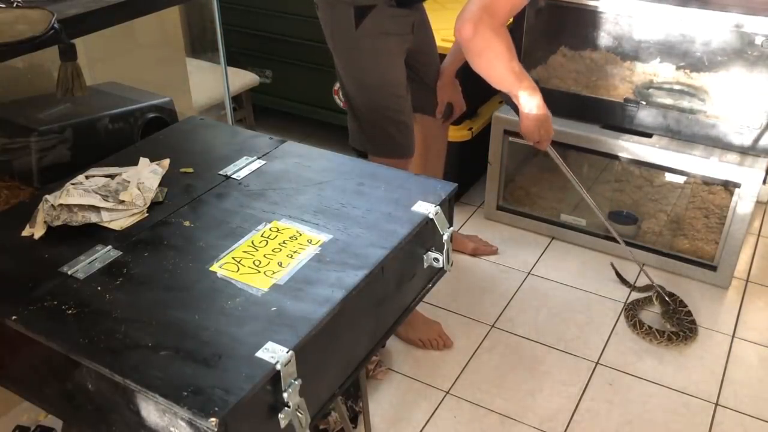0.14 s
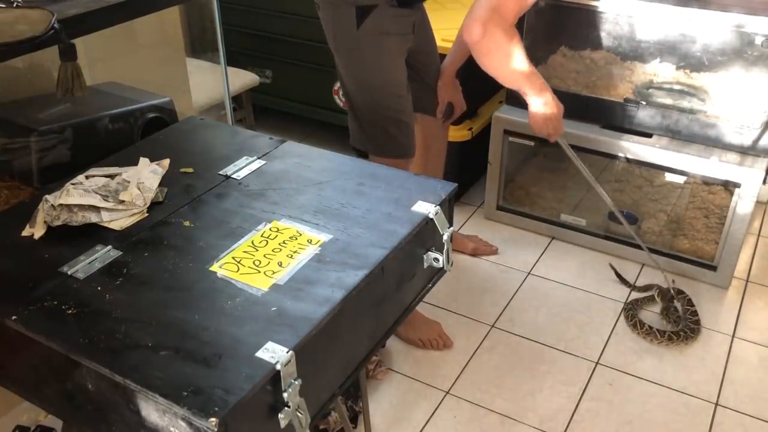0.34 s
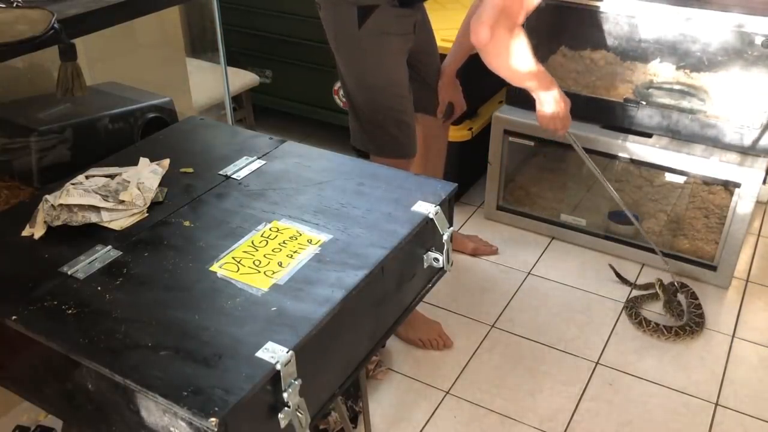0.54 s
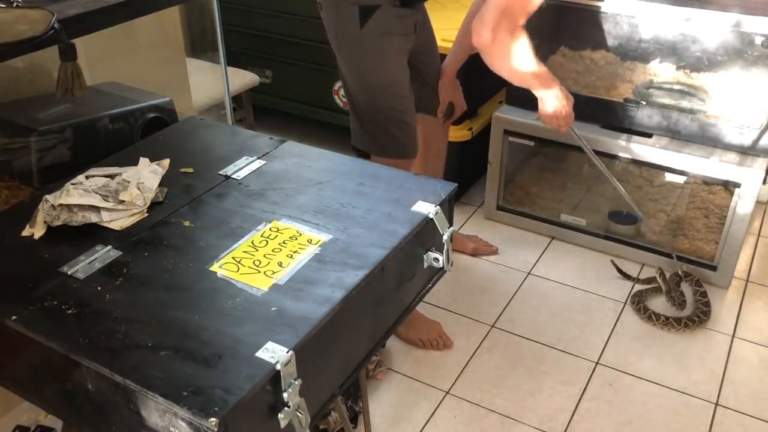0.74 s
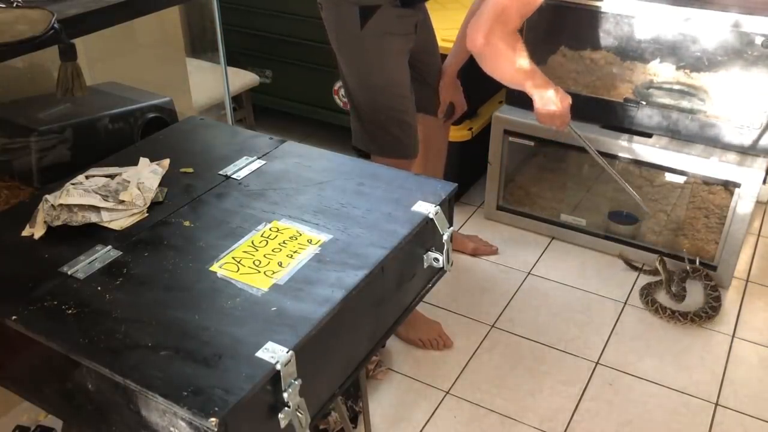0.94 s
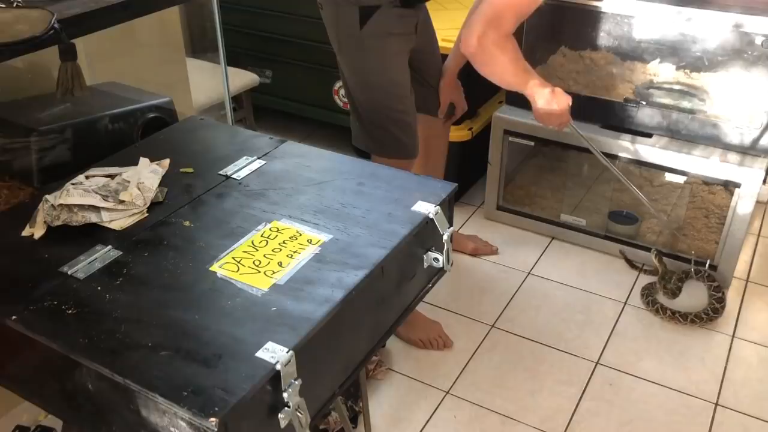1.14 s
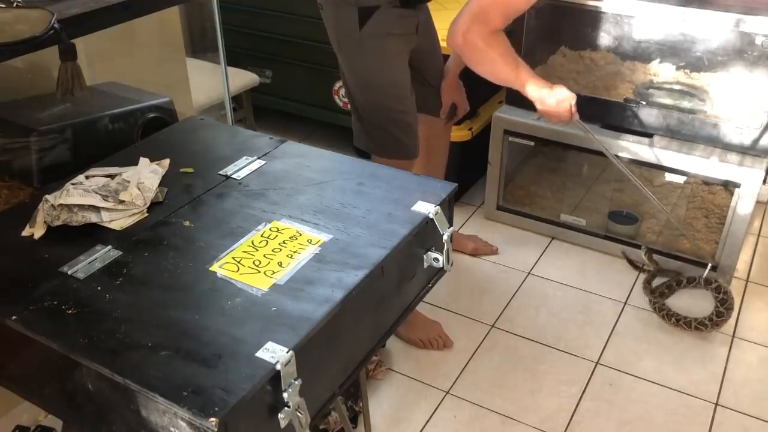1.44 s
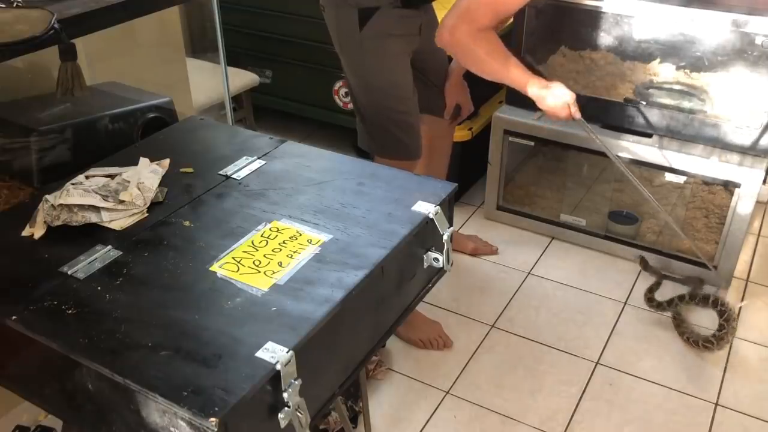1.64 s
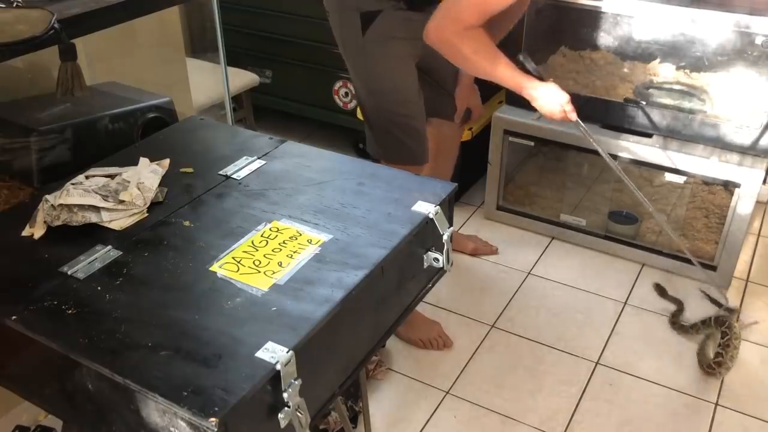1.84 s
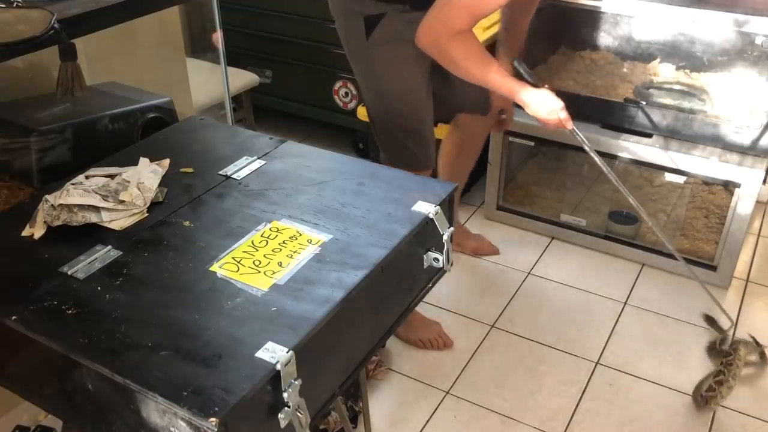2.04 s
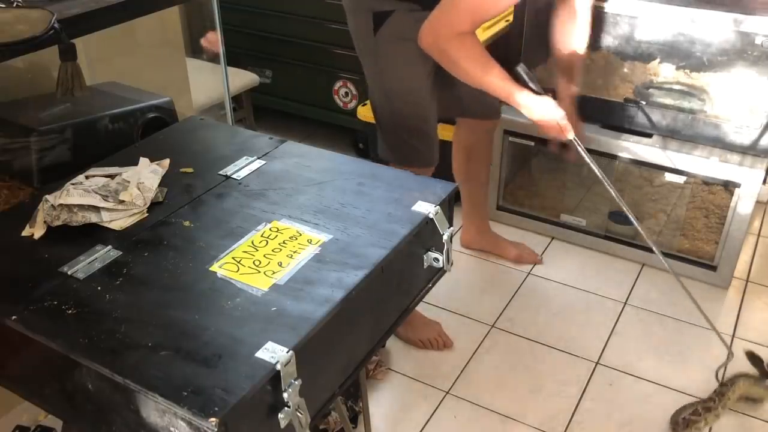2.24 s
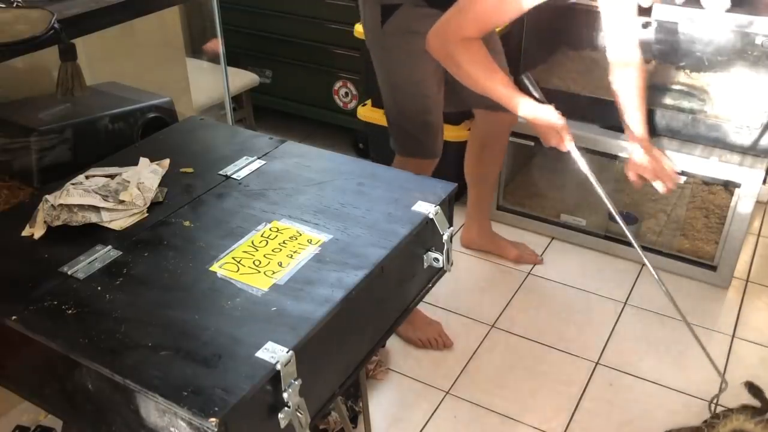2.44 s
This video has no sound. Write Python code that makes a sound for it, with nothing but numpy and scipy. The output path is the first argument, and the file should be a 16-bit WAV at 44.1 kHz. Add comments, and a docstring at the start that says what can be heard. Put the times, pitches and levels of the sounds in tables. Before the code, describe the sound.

A rattlesnake's tail buzzes from start to end, about 2.5 seconds: very fast dry clicks blurred into a bright, sizzling hiss, strongest around 4 to 7 kHz, with slight swells, sharper ticks and brief gliding rings. At about 1.1 seconds comes a short, light, hard double knock. From about 2.1 seconds a faint soft scuff slides over tile. Low fan hum, airy noise and a thin whine stay underneath in a small reflective room.

```python
"""In a small tiled room a rattlesnake, lifted on a hook, buzzes its tail without a pause.
At each turn of the tail dry horn segments collide: impulses and rubbing noise excite the horn's resonances.
Diffuse reverberation and a floor echo blur the clicks into a hiss; narrow gliding resonances ring out in turn.
Filtered noise bursts give sharper ticks and a short knock, and band-limited noise a soft scuff.
Behind them are fans: wavering tones, coloured air noise and a thin narrow-band whine."""
import sys
import numpy as np
from scipy import signal
from scipy.fft import rfft, irfft
from scipy.io import wavfile
from scipy.ndimage import map_coordinates

SR = 44100
rng = np.random.default_rng(int(sys.argv[2]) if len(sys.argv) > 2 else 0)


def generate_wav(signal):
    """Clip the signal to [-1, 1] and save it as 16-bit WAV at the path in sys.argv[1]."""
    frames = np.transpose(np.atleast_2d(signal))
    scaled = np.clip(frames, -1, 1) * 32767
    pcm = np.round(scaled).astype(np.int16)
    wavfile.write(sys.argv[1], SR, pcm)


N = 114660
TIME = np.arange(N) / SR
RUB_S = 0.0067  # energy decay constant of horn rubbing on horn after each clack
ROOM_T60_S = 0.26  # time for the reverberation to fall by 60 dB


def from_db(db):
    """Level as a logarithm: 20 dB is a factor of ten in amplitude."""
    return 10 ** (np.asarray(db) / 20)


def rms_one(x):
    """Normalisation by mean power: scale to rms 1."""
    return x / np.sqrt(np.mean(x ** 2) + 1e-20)


def drift(corner_hz):
    """Low-passed noise: white noise through a double real pole gives smooth random variation of rms 1."""
    step = 40  # samples between the computed points
    pole = np.exp(-2 * np.pi * corner_hz * step / SR)
    noise = rng.standard_normal(N // step + 2002)
    slow = signal.lfilter([1], [1, -2 * pole, pole * pole], noise)[2000:]  # drop the settling
    return np.interp(np.arange(N) / step, np.arange(len(slow)), rms_one(slow))


def butter(x, hz, kind, order=2):
    """Butterworth filter: maximally flat in its passband."""
    corners = np.clip(hz, 10, .45 * SR)
    sos = signal.butter(order, corners, kind, fs=SR, output="sos")
    return signal.sosfilt(sos, x + 1e-18)


def colour(x, spectrum):
    """Minimum-phase filter by folded cepstrum; it wraps round, so steady sounds are under way at once."""
    hz, db = np.transpose(spectrum)
    grid_hz = np.arange(N // 2 + 1) * SR / N + 1
    log_gain = np.log(from_db(np.interp(np.log(grid_hz), np.log(hz), db)))
    cepstrum = irfft(log_gain)[:N // 2]
    response = np.exp(2 * rfft(cepstrum, N) - cepstrum[0])
    return irfft(rfft(x) * response, N)


def burst(start_s, decay_s):
    """Impact noise: random signs under an exponential amplitude decay, with unit energy."""
    age = TIME - start_s
    envelope = (age >= 0) * np.exp(-np.clip(age / decay_s, 0, 60))
    x = rng.choice([-1, 1], N) * envelope
    return x / np.sqrt(np.sum(x ** 2))


def smear(x, decay_s):
    """Diffuse-field decay: noise (rms 1) whose energy is that of x convolved with a wrapped exponential."""
    decay = np.exp(-np.minimum(TIME / decay_s, 60))
    energy = irfft(rfft(x ** 2) * rfft(decay), N)
    return rms_one(np.sqrt(np.abs(energy)) * rng.standard_normal(N))


def room_tail(x):
    """Statistical reverberation: convolution with decaying noise of unit energy, for tiles and walls."""
    gap_s = 0.0025  # silence before the first reflection
    tail = rng.standard_normal(N) * from_db(-60 * TIME / ROOM_T60_S) * (TIME > gap_s)
    tail = tail / np.sqrt(np.sum(tail ** 2))
    return irfft(rfft(x) * rfft(tail), N)


def in_room(x, room_db):
    """Superposition of the direct sound and its reverberation."""
    return x + from_db(room_db) * room_tail(x)


def rattle():
    """Impact and friction excite resonant horn; reverberation and a moving floor echo (comb filter) follow."""
    # level of the rattle in five frequency registers, before trim and flutter:
    # t/s, skirt level/dB, low body level/dB, high body level/dB, middle level/dB, top level/dB
    vigour = [(0.0, -51.5, -38.5, -37, -43.5, -42.5), (0.16, -46.5, -37, -36, -42, -41),
              (0.205, -48, -40.5, -37, -43, -39), (0.28, -47.5, -37, -34.5, -43.5, -42),
              (0.43, -47.5, -39, -36, -42.5, -40.5), (0.52, -46.5, -38, -35.5, -42, -40.5),
              (0.72, -44.5, -38.5, -34, -40.5, -40), (0.86, -46, -35.5, -34, -40, -38),
              (0.98, -49, -39, -37.5, -43.5, -42), (1.04, -42.5, -37.5, -32, -38, -38.5),
              (1.065, -49, -39, -35, -42, -39.5), (1.11, -49, -37.5, -35, -38, -38.5),
              (1.18, -49, -37, -37, -39.5, -40), (1.225, -50, -40.5, -34.5, -43, -42.5),
              (1.27, -49.5, -37.5, -34.5, -41.5, -40), (1.44, -48.5, -39, -35.5, -40, -40),
              (1.52, -50.5, -35.5, -35, -39, -39.3), (1.62, -48.5, -36.5, -35, -39.3, -39),
              (1.67, -45, -40.5, -35, -37.5, -40), (1.82, -45, -35, -34, -39.5, -37.5),
              (1.92, -44.5, -38, -36, -39.5, -42), (2.03, -47, -35, -36, -41.5, -40.5),
              (2.13, -43.5, -38, -35, -40, -40), (2.27, -47, -36, -36, -40, -40),
              (2.305, -60, -39.5, -39.5, -43.5, -43.5), (2.37, -47, -37.0, -36, -40, -39),
              (2.6, -43.5, -37.5, -36.5, -38.5, -41)]
    # limits of the registers, lowest first: f/Hz
    edges_hz = (2400, 3800, 5000, 7500, 12300, 16000)
    # constant trim of each register: level/dB
    trim_db = (0.026, 0.023, 0.052, 0.16, 0.77)
    # rms flicker of each register by itself: level/dB
    flicker_db = (0.2, 0.17, 0.24, 0.3, 0.76)
    # diffuse reverberation in each register against the direct clacks: level/dB
    blur_db = (4.2, 6.4, 2.6, 4, 2.4)
    # resonance of the hollow segments: f/Hz, relative spectral level/dB
    horn = [(1410, -62), (2400, -19), (2790, -15), (3600, -15), (3950, -7), (4200, -4), (4500, -1.5),
            (4900, 0), (5460, 1), (6000, -3), (6500, -3.5), (7070, -3.5), (8670, -10), (10500, -9.5),
            (12000, -12.5), (12600, -14.5), (13400, -10.5), (14400, -13), (15600, -12)]
    size_scatter_db, rub_db, room_db = 4, -6.5, -5.5
    flutter_db, flutter_hz, flicker_hz = 0.15, 29, 35  # flutter: unevenness of the whole shake

    at, clack_db = clacks()
    level_times, *levels = np.transpose(vigour)
    flutter = flutter_db * drift(flutter_hz)
    out = 0
    for k, level in enumerate(levels):
        chance = rng.standard_normal((len(at), 2))
        size_db = clack_db + size_scatter_db * np.clip(chance[:, 0], -2, 2)
        impulses = from_db(size_db) * np.sign(chance[:, 1])
        clicks = rms_one(np.bincount(at, impulses, N)[:N])
        rubbing = from_db(rub_db) * smear(clicks, RUB_S)
        blur = from_db(blur_db[k]) * smear(clicks, ROOM_T60_S / np.log(1e6))  # energy falls by 1e6 in T60
        ringing = colour(clicks + rubbing + blur, horn)
        register = rms_one(butter(ringing, edges_hz[k:k + 2], "band", order=6))
        flicker = flicker_db[k] * drift(flicker_hz)
        out = out + register * from_db(np.interp(TIME, level_times, level) + trim_db[k] + flutter + flicker)
    near = out + floor_echo(out)
    heard = near + from_db(room_db) * moving_room(near)
    heard = rms_one(heard) * np.std(out)  # echo and room leave the overall level as it was
    return heard + segment_rings(clicks)


def clacks():
    """Successive collisions at each reversal, two per oscillation: (sample, dB) of each segment's impact."""
    shakes_hz, shake_wander, wander_hz = 52, .1, 3  # mean rate, relative rms wander and its corner
    segment_count, spread_s = 9, .0062
    backstroke_db, stroke_scatter_db, clack_scatter_db = -1.8, -0.93, 3
    strokes = np.cumsum(2 * shakes_hz * (1 + shake_wander * drift(wander_hz))) / SR
    turns = np.flatnonzero(np.diff(np.floor(strokes), prepend=-1))
    delay_s = rng.random((len(turns), segment_count)) * spread_s
    stroke_db = stroke_scatter_db * rng.standard_normal(len(turns))
    stroke_db = stroke_db + backstroke_db * (np.arange(len(turns)) % 2)
    scatter = np.clip(rng.standard_normal((len(turns), segment_count)), -2, 2)
    db = stroke_db[:, None] + clack_scatter_db * scatter
    at = (turns[:, None] + delay_s * SR).astype(int)
    return at.ravel(), db.ravel()


def floor_echo(x):
    """Specular reflection: one weaker copy whose delay shifts as the tail moves."""
    lag_s, lag_swing, tail_moves_hz, echo_db = 0.001118, 0.253, 1.173, -16  # swing: relative rms
    echo_time = TIME - lag_s * (1 + lag_swing * drift(tail_moves_hz))
    return from_db(echo_db) * map_coordinates(x, [echo_time * SR], order=3)


def moving_room(x):
    """Position-dependent reverberation: reflection patterns cross-fade as the snake is carried along."""
    place_count = 9
    place = TIME / TIME[-1] * (place_count - 1)
    out = 0
    for k in range(place_count):
        presence = np.cos(np.pi / 2 * np.clip(place - k, -1, 1))  # equal-power cross-fade
        out = out + room_tail(x * presence)
    return out


def segment_rings(clicks):
    """Forced resonance: the clacks excite a narrow band that swells, glides and fades."""
    # as the tail twists, one hollow segment after another rings out:
    # start t/s, length t/s, first f/Hz, last f/Hz, level/dB before the swell
    rings = [(0.542, 0.36, 3920, 4400, -43), (.76, 0.192, 4320, 4980, -37),
             (1.234, 0.32, 10400, 10700, -46.5), (1.27, .15, 13750, 13600, -47),
             (1.47, 0.098, 6440, 6330, -39), (1.7, 0.13, 12900, 13350, -40), (1.784, 0.1, 4700, 4730, -39),
             (1.92, .09, 5250, 5100, -42), (1.845, 0.34, 3200, 3650, -50),
             (2.246, 0.039, 5400, 5400, -32.5), (2.29, 0.16, 7250, 7060, -42)]
    quality = 12  # first pitch over bandwidth
    drive = clicks + smear(clicks, RUB_S)
    out = 0
    for start_s, length_s, first_hz, last_hz, db in rings:
        progress = np.clip((TIME - start_s) / length_s, 0, 1)
        pitch_hz = first_hz + (last_hz - first_hz) * progress
        carrier = np.exp(2j * np.pi * np.cumsum(pitch_hz) / SR)
        # shift the pitch to zero, low-pass, and shift back: a band-pass that glides
        ring = np.real(butter(drive / carrier, first_hz / quality / 2, "low") * carrier)
        swell = np.sqrt(4 * progress * (1 - progress))
        out = out + from_db(db) * rms_one(ring) * swell
    return out


def snaps():
    """Transient excitation: now and then the segments catch harder and ring briefly."""
    # sharper snaps of the rattle: t/s, relative level/dB, centre f/Hz, width f/Hz
    snap_table = [(0.0345, -4, 13700, 2500), (0.1603, -2, 14400, 3500), (.3005, -6, 10000, 3500),
                  (.4872, -3.5, 9500, 4000), (.622, -5.5, 14100, 2000), (0.6903, -4, 5200, 2000),
                  (0.819, -4, 4870, 1500), (.836, -10, 13600, 1500), (0.913, -3, 5230, 1500),
                  (1.0855, -7, 14000, 2500), (1.0884, -9, 11000, 3000), (1.2885, -6, 14000, 2000),
                  (2.0226, -9, 4800, 1500), (2.2605, -6, 5500, 1500)]
    decay_s, all_db, room_db = 0.0037, -5.5, -3
    x = 0
    for start_s, db, hz, width_hz in snap_table:
        x = x + from_db(db) * colour_snap(burst(start_s, decay_s), hz, width_hz)
    return from_db(all_db) * in_room(x, room_db)


def colour_snap(x, hz, width_hz):
    """Broad resonance: a band-pass stands for one mode of the horn; unit energy."""
    band = (hz - width_hz / 2, hz + width_hz / 2)
    return rms_one(butter(x, band, "band")) / np.sqrt(N)


def knock():
    """Repeated impact: two hard, light contacts, the second brighter, then a weak bounce."""
    # contacts: t/s, level/dB before filtering, highest f/Hz
    contacts = [(1.1147, 3, 6100), (1.1162, .5, 15000), (1.1382, -1, 6500)]
    decay_s, low_hz, room_db = .0011, 4200, -6
    x = 0
    for start_s, db, high_hz in contacts:
        x = x + from_db(db) * butter(burst(start_s, decay_s), (low_hz, high_hz), "band")
    return in_room(x, room_db)


def scuff():
    """Sliding friction as shaped noise: something soft slides briefly over the tiles."""
    # colour of the friction: f/Hz, relative spectral level/dB
    friction_colour = [(350, -13), (700, -3), (1400, -5.5), (2200, -13), (3300, -0.5), (5000, -11)]
    start_s, attack_s, hold_s, release_s = 2.09, 0.026, 0.34, 0.38
    level_db, uneven_db, uneven_hz = -48.5, 1.0, 8.7
    corners = start_s + np.cumsum([0, attack_s, hold_s, release_s])
    envelope = np.interp(TIME, corners, [0, 1, 1, 0])
    noise = colour(rng.standard_normal(N), friction_colour)
    friction = rms_one(butter(noise, (300, 5000), "band"))
    return friction * envelope * from_db(level_db + uneven_db * drift(uneven_hz))


def fans():
    """Tonal and broadband fan noise: wavering motor tones, moving air and a thin whine."""
    # steady motor tones: f/Hz, rms level/dB
    hum_tones = [(52, -77), (94.5, -56), (120, -52), (136, -50.5), (209, -76), (317, -57), (705, -66),
                 (1152, -71), (2187, -62), (2223, -63.5), (2326, -64.5)]
    # colour of the moving air: f/Hz, relative spectral level/dB
    air_colour = [(25, -22), (40, -22), (52, -4.5), (80, -11.5), (130, -16), (165, -3), (205, 2), (260, -1),
                  (325, -0.5), (400, -5), (520, -9), (800, -10), (1200, -14.5), (1900, -19), (4000, -17.5),
                  (15000, -28.5)]
    waver_depth, waver_hz = 0.13, 11
    air_db, surge_db, surge_hz = -43, 1.0, 6.2  # the draught is uneven
    whine_hz, whine_width_hz, whine_db = 2196, 140, -58.5
    hum = 0
    for hz, db in hum_tones:
        # complex waver changes both amplitude and phase
        waver = 1 + waver_depth * (drift(waver_hz) + 1j * drift(waver_hz))
        tone = np.real(waver * np.exp(2j * np.pi * (hz * TIME + rng.random())))
        hum = hum + from_db(db) * rms_one(tone)
    air = rms_one(colour(rng.standard_normal(N), air_colour))
    air = from_db(air_db + surge_db * drift(surge_hz)) * air
    whine_band = (whine_hz - whine_width_hz / 2, whine_hz + whine_width_hz / 2)
    whine = rms_one(butter(rng.standard_normal(N), whine_band, "band"))
    return hum + air + from_db(whine_db) * whine


def scene():
    """Linear superposition: all sources add, equal in both channels, so they are heard from the centre."""
    x = rattle() + snaps() + knock() + scuff() + fans()
    return np.array([x, x])


def record(dry):
    """Band limitation: an elliptic low-pass cuts the top steeply."""
    cutoff_hz, ripple_db, stop_db = 15780, .1, 75
    sos = signal.ellip(12, ripple_db, stop_db, cutoff_hz, fs=SR, output="sos")
    return signal.sosfilt(sos, dry)


dry = scene()
out = record(dry)
generate_wav(out)
```